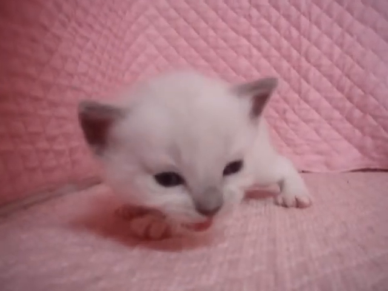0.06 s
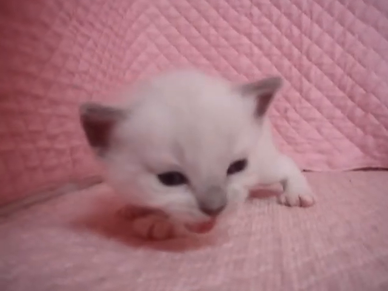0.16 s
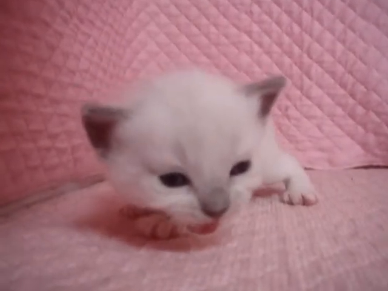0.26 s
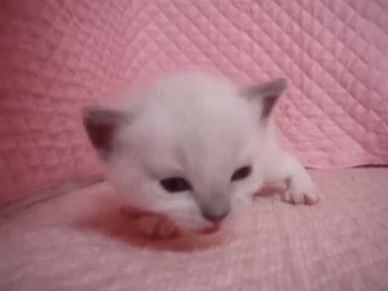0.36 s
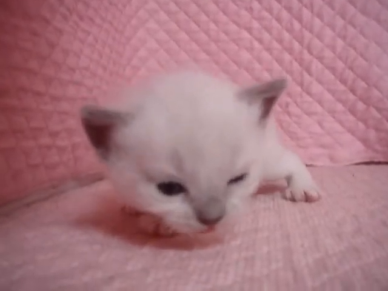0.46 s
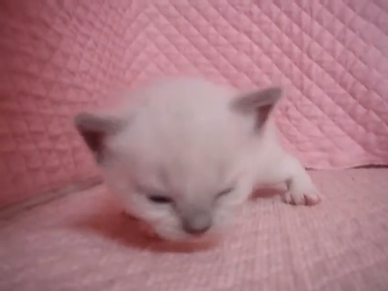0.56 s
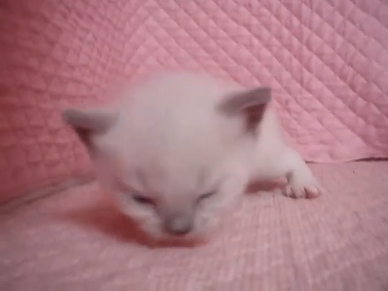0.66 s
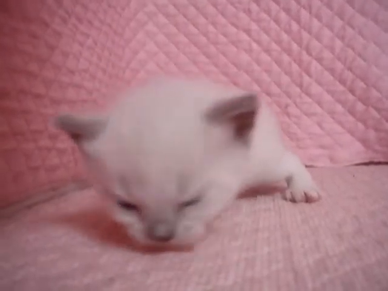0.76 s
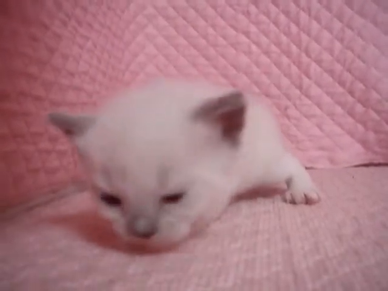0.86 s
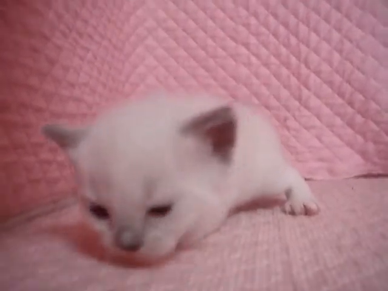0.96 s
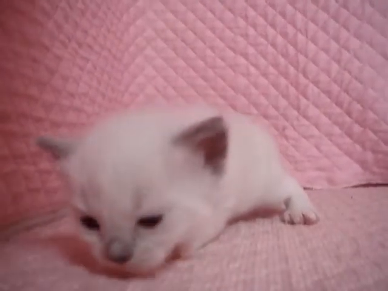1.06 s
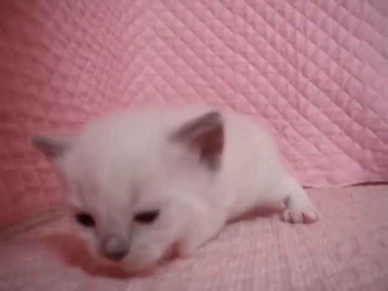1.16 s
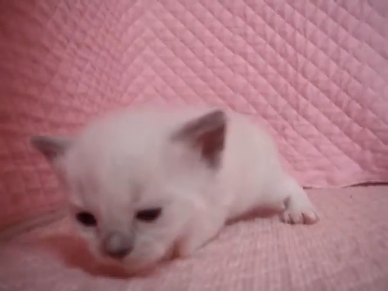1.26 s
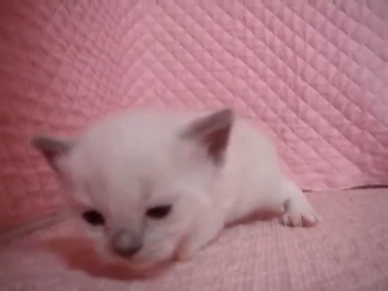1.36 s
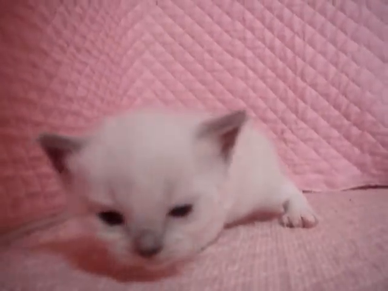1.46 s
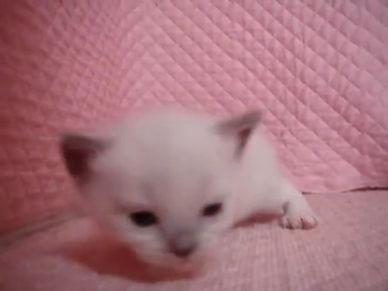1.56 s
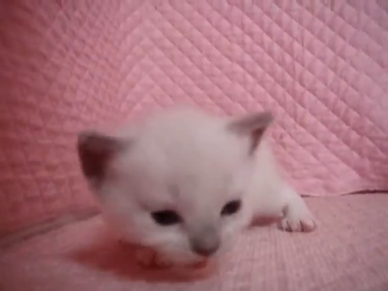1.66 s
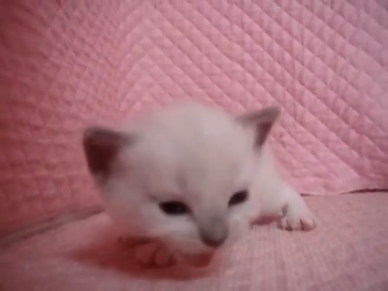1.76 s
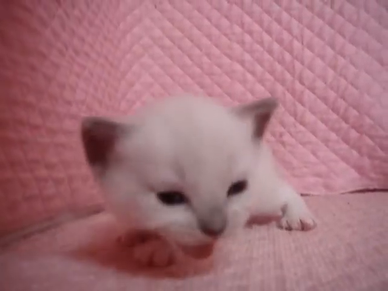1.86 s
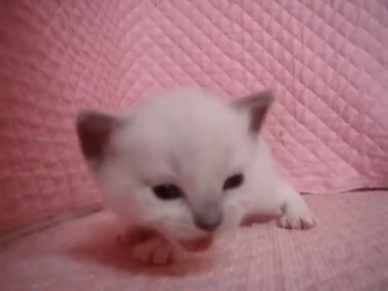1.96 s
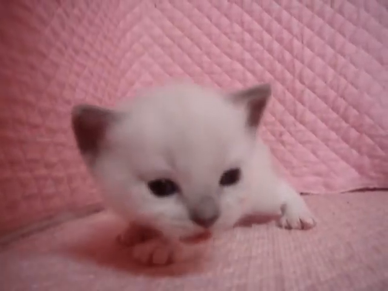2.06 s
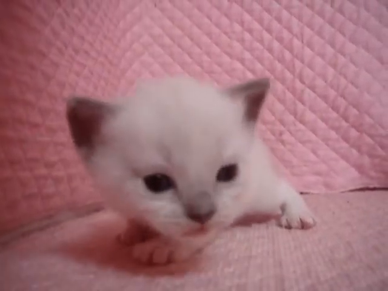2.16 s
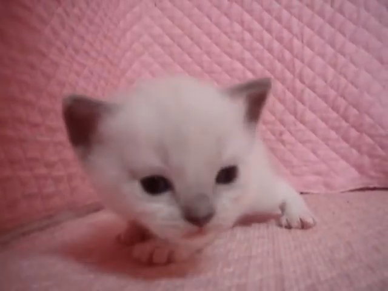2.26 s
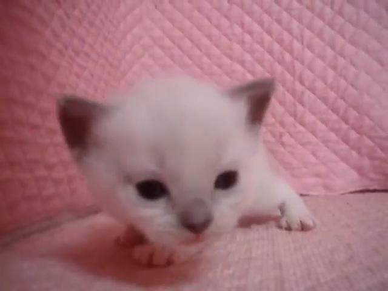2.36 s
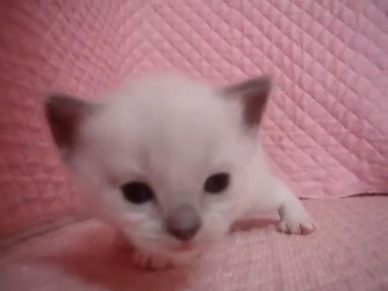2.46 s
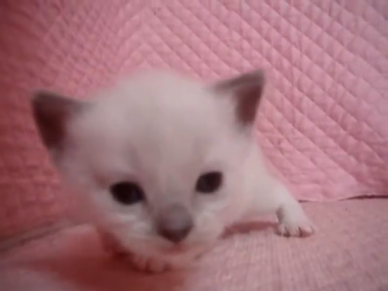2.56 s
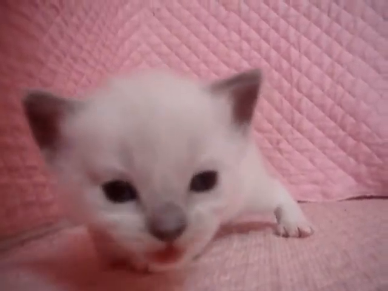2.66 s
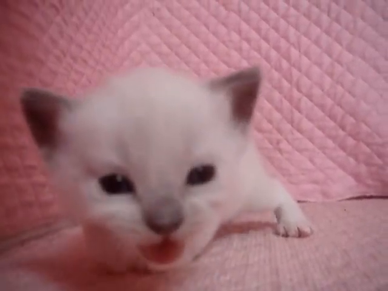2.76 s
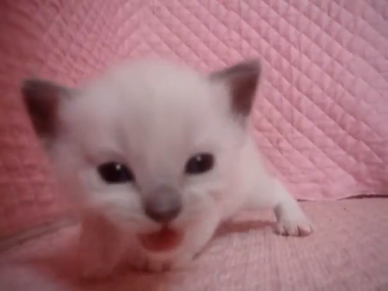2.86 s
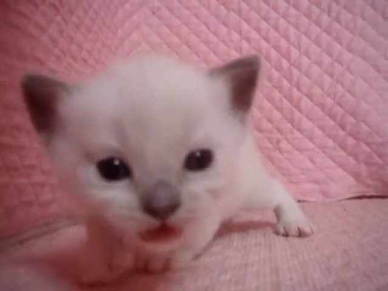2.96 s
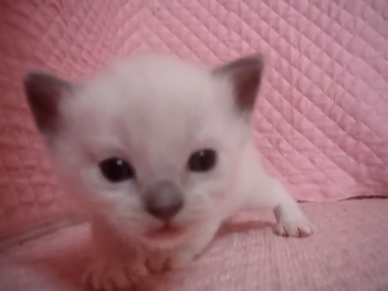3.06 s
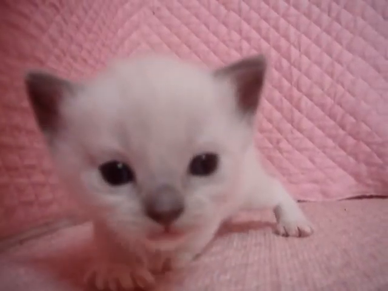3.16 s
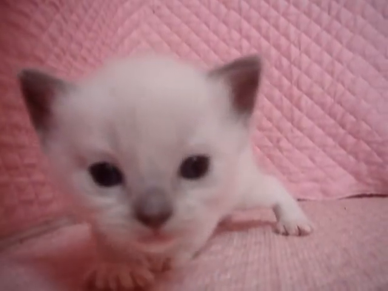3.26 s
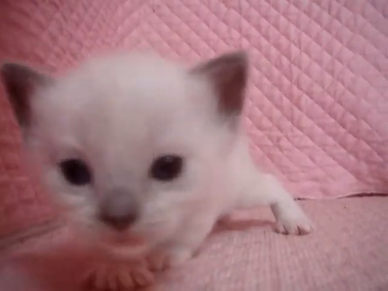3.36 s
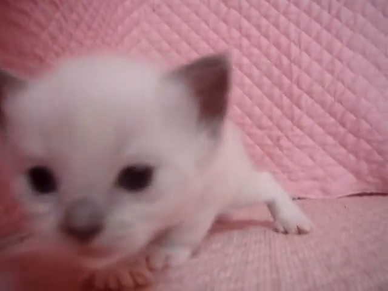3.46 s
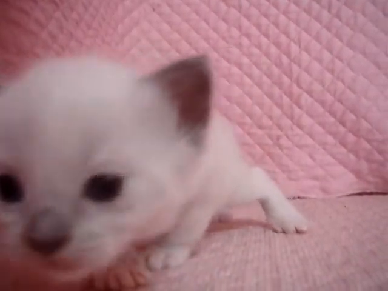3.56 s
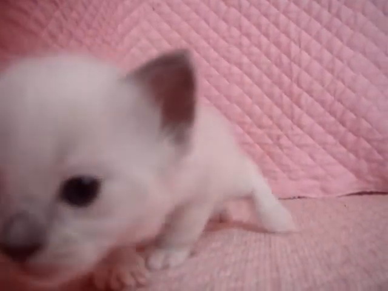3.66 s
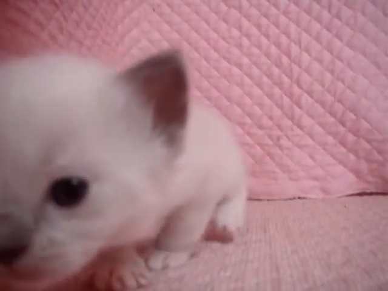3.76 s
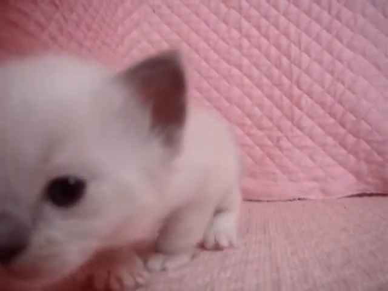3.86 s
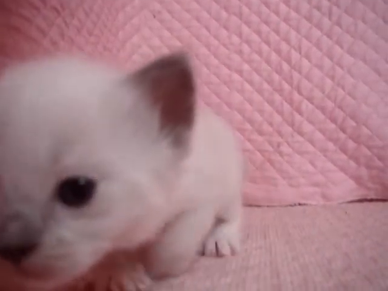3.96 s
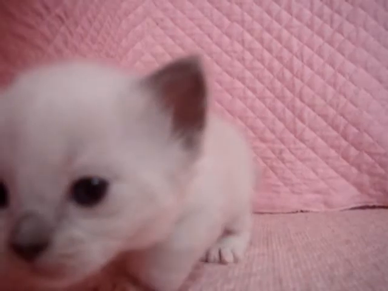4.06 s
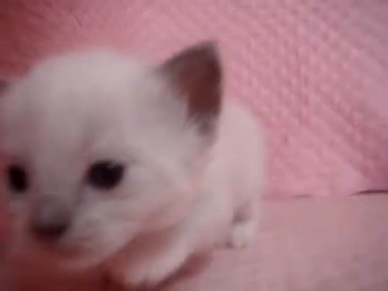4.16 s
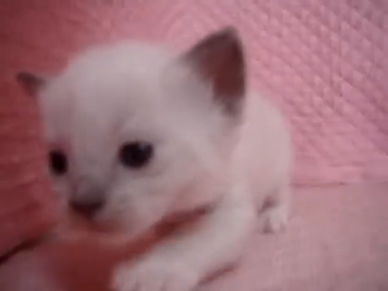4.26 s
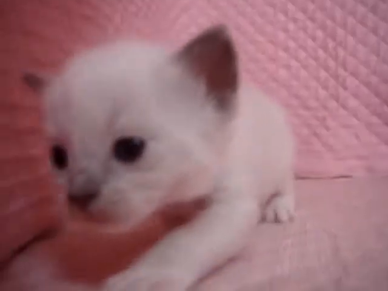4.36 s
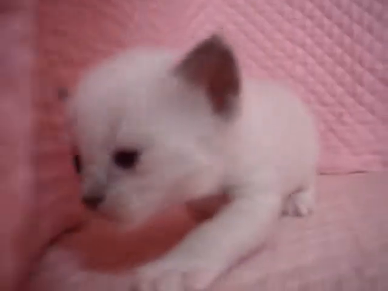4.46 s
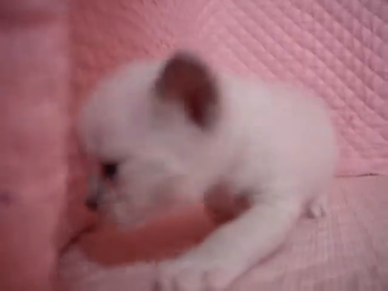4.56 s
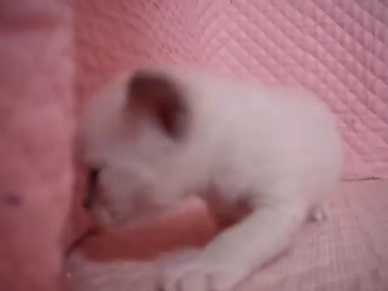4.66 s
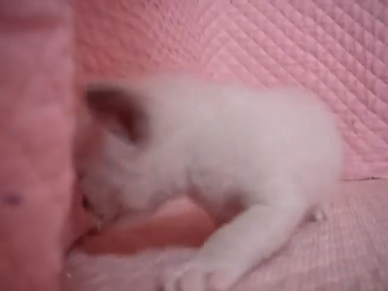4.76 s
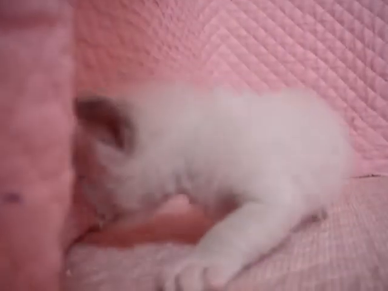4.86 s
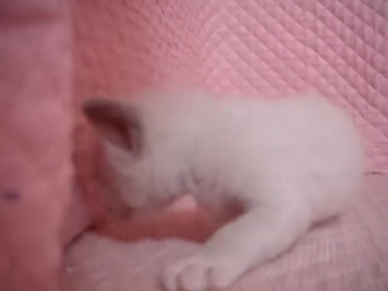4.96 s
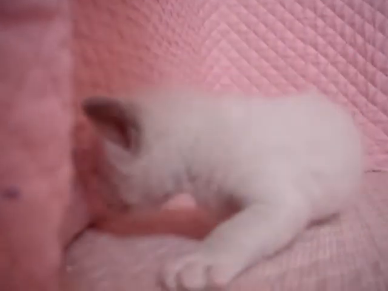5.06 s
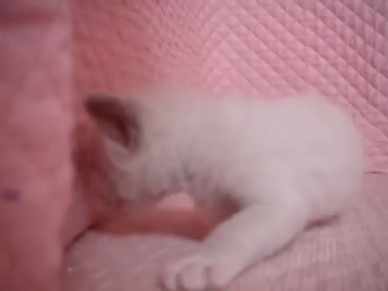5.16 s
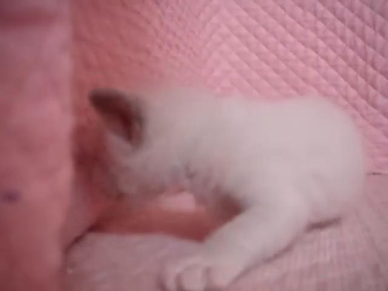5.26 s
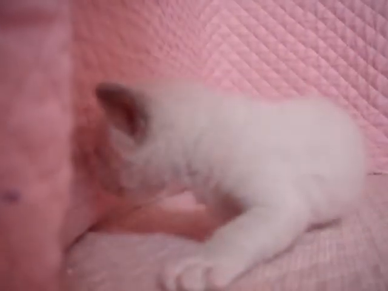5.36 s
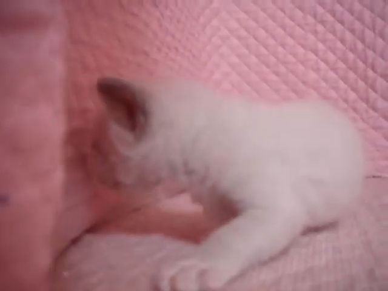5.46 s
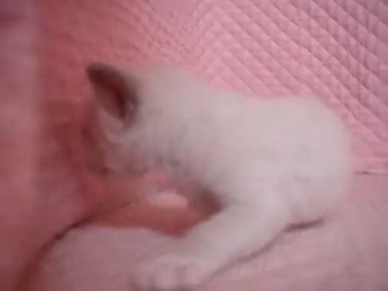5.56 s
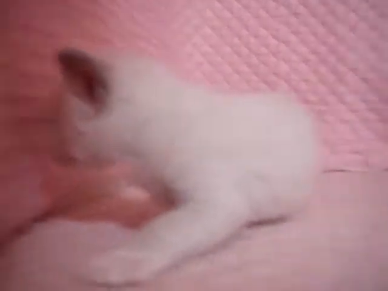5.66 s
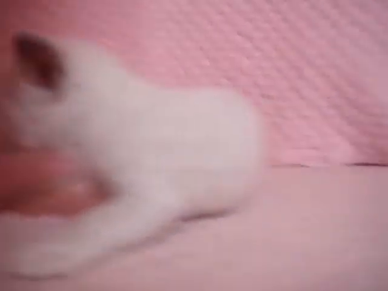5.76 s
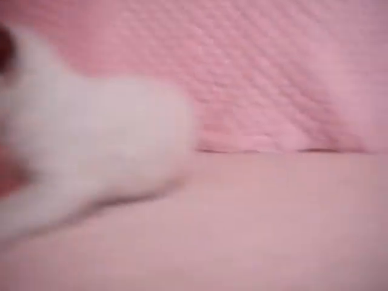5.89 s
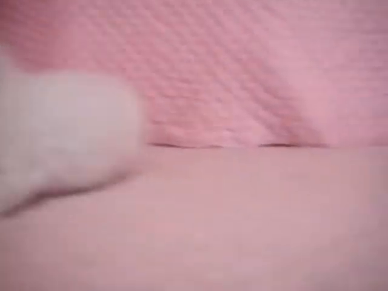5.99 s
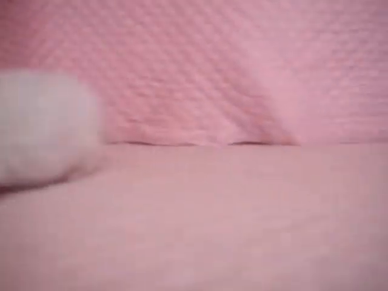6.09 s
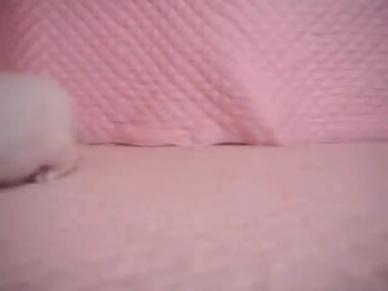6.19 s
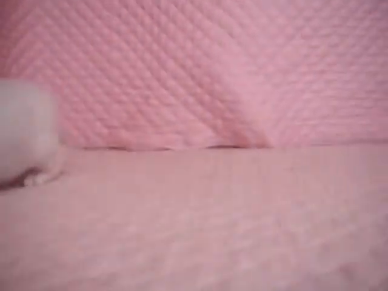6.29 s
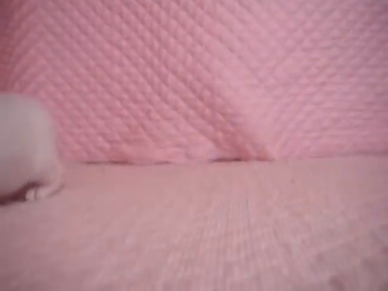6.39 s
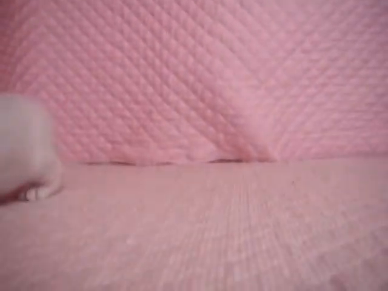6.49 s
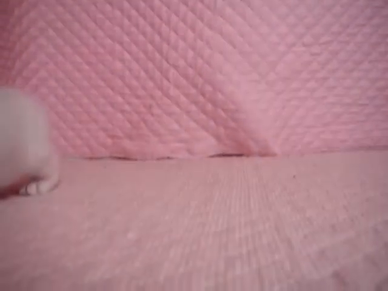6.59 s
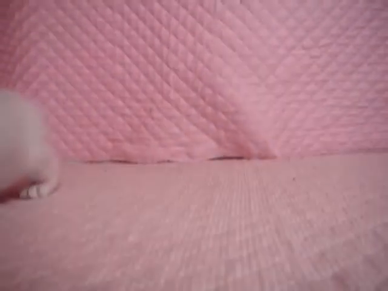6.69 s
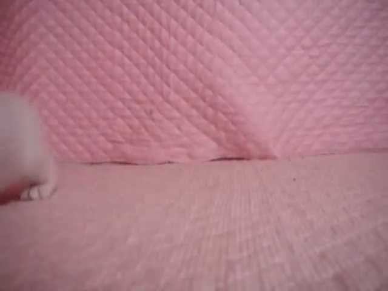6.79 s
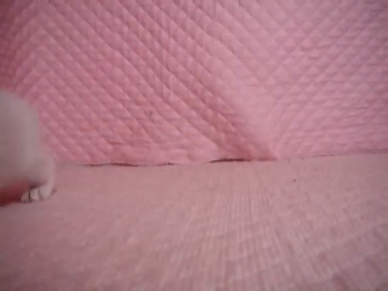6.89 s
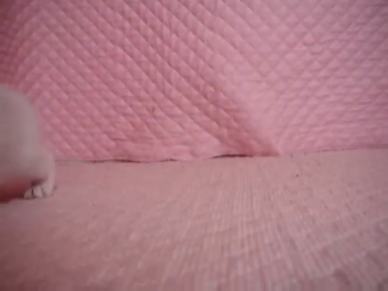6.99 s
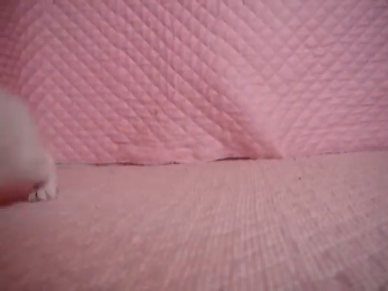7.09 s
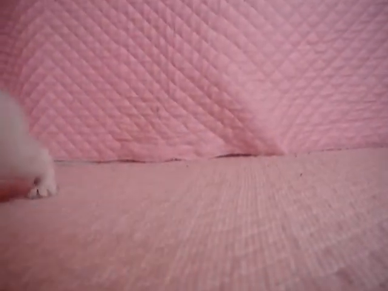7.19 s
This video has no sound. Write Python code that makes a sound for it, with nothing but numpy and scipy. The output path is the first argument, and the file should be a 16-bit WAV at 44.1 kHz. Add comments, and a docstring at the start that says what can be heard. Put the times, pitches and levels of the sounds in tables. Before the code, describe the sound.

A tiny kitten mews four times in high, rough-edged calls on a quilted bed, with cloth rustles, soft bumps and a faint thin whine.

```python
"""In a bedroom full of soft things, a small kitten mews four times on a quilted bed, close to a camera.
Each mew is a stack of tones that starts rough, scoops up and arches near 1.1 kHz; a creak leads into the last.
Shaped noise makes the cloth rustle, slide and bump as the kitten creeps off; ringing bursts of noise are ticks.
Behind lie a soft murmur of noise, a wavering hum and the thin whine of the camera's electronics."""
import sys
import numpy as np
from scipy import signal
from scipy.fft import rfft, irfft
from scipy.io import wavfile

SR = 44100
rng = np.random.default_rng(int(sys.argv[2]) if len(sys.argv) > 2 else 0)


def transcribe(u):
    """Save the signal u as a 16-bit wav file named by the first command-line argument.

    u: samples, shape (n,) or (channels, n), limited to [-1, 1]; the rate is SR.
    q: integer samples, one column per channel.
    """
    v = np.clip(np.atleast_2d(u).T, -1, 1)
    q = np.round(v * 32767).astype(np.int16)
    wavfile.write(sys.argv[1], SR, q)


N = 318842  # length [samples]
T = np.arange(N) / SR  # time of each sample [s]


def undb(db):
    """Turn decibels into a gain."""
    return 10 ** (np.asarray(db) / 20)


def unit(x):
    """Scale a sound to an average (rms) level of 1."""
    return x / np.sqrt(np.mean(x ** 2))


def shape(x, gain):
    """Filter a sound by a gain that depends on frequency."""
    hz = np.maximum(np.fft.rfftfreq(N, 1 / SR), 1)
    return irfft(rfft(x) * gain(hz), N)


def noise(points):
    """Make noise of rms 1, coloured by (frequency [Hz], level [dB]) points."""
    hz, db = np.transpose(points)
    return unit(shape(rng.standard_normal(N), lambda f: undb(np.interp(np.log(f), np.log(hz), db))))


def wander(rate):
    """Make a random motion of rms 1, up to about this rate [Hz]."""
    return unit(shape(rng.standard_normal(N), lambda f: 1 / (1 + (f / rate) ** 2)))


def swell(at, length):
    """Make a smooth hump of height 1 centred on a moment."""
    return np.cos(np.pi * np.clip((T - at) / length, -.5, .5))


def swells(rows, bow=1):
    """Add up humps from (middle [s], length [s], level [dB]) rows; a bow under 1 flattens their tops."""
    return sum(undb(db) * swell(at, length) ** bow for at, length, db in rows)


# colour of the room's steady murmur and hiss: (frequency [Hz], relative level [dB])
MURMUR_COLOUR = [(25, -12), (50, -12.5), (85, -11.5), (130, -7), (280, -2.5), (420, -1.5), (600, -3.5),
                 (850, -8.5), (1130, -10), (1900, -16.5), (4500, -22.5), (10000, -25)]


def room_murmur():
    """Low-heavy noise, gently wavering in level, is the sound of the quiet room."""
    return noise(MURMUR_COLOUR) * undb(-48 + .5 * wander(4))


# faint hum in the room: (middle frequency [Hz], middle level [dB])
HUM_TONES = [(120, -67.5), (272, -63.5), (420, -61.5), (597, -63)]


def hum():
    """Low tones drift a little in pitch and strength."""
    out = np.zeros(N)
    for hz, db in HUM_TONES:
        phase = 2 * np.pi * np.cumsum(hz + 5 * wander(15.17)) / SR
        out += undb(db + 2 * wander(4.6)) * np.sqrt(2) * np.sin(phase)
    return out


# tones of the camera's electronics: (frequency [Hz], level before the band filter [dB])
WHINE_TONES = [(7875, -45.6), (7625, -62.5)]
FRAME_HZ = 30  # pictures per second


def whine():
    """The camera's electronics sing; restarting the tones with every picture gives them a slight buzz."""
    since_frame = (T - .003) % (1 / FRAME_HZ)
    tones = sum(np.sqrt(2) * undb(db) * np.sin(2 * np.pi * hz * since_frame) for hz, db in WHINE_TONES)
    # keep only a band around the tones
    return shape(tones, lambda f: 1 / (1 + ((f - 7850) / 450) ** 4))


# colour of cloth sliding: (frequency [Hz], relative level [dB])
SLIDING_COLOUR = [(200, -10), (800, -1.5), (1600, -5.5), (2350, 3), (3300, -5), (4450, -2), (5300, -3.5),
                  (6200, -2.5), (10000, -4.5)]
# slow slides over the quilt: (middle [s], length [s], level before flutter [dB])
SLOW_SLIDES = [(.02, 0.42, -44.5), (.3, 0.25, -48.5), (1.66, .2, -60), (3.3, .36, -52.5),
               (3.61, 0.34, -50.5), (3.97, 0.4, -49.5), (4.37, 0.55, -40), (5.92, 1.006, -38),
               (7.02, 0.43, -58)]


def quilt_slides():
    """Countless threads slip under slow sliding, which makes a dull, fluttering hiss."""
    return noise(SLIDING_COLOUR) * swells(SLOW_SLIDES, bow=0.52) * undb(1.17 * wander(44))


# colour of fur and claws on cloth: (frequency [Hz], relative level [dB])
BRUSHING_COLOUR = [(500, -13), (3000, -10.5), (6000, -7), (8500, 0.5), (10000, -3.5)]
# short brushes of fur and claws: (middle [s], length [s], level before flutter [dB])
QUICK_BRUSHES = [(.03, 0.022, -41), (1.28, 0.15, -51.5), (1.368, 0.033, -40), (1.46, 0.12, -48.5),
                 (1.56, 0.056, -42), (1.66, 0.1, -42.5), (1.773, 0.012, -28.5), (1.782, 0.0043, -28),
                 (1.805, 0.043, -42), (2.31, 0.065, -43), (2.42, 0.17, -41.5), (2.575, 0.095, -44.5)]


def quilt_brushes():
    """Quick brushes slip the threads faster, which makes a bright, fluttering hiss."""
    return noise(BRUSHING_COLOUR) * swells(QUICK_BRUSHES) * undb(2 * wander(85))


# claws catching threads: (start [s], peak level [dB], centre frequency [Hz], decay [s])
THREAD_TICKS = [(0.042, -26, 7140, 0.00087), (1.679, -19.5, 8000, .0003), (2.6545, -29, 2200, 0.0012),
                (2.666, -28, 3830, 0.0008), (3.5999, -29.5, 2000, 0.00026), (5.7608, -26.5, 2400, 0.0058)]


def claw_ticks():
    """A claw catches a thread: noise around one frequency starts at once and dies away."""
    out = np.zeros(N)
    for at, db, hz, decay in THREAD_TICKS:
        colour = [(hz / 10, -25), (hz / 2, -10), (hz, 0), (hz * 2, -14), (hz * 4, -26)]
        fade = (T >= at) * np.exp(-np.clip((T - at) / decay, 0, 20))
        tick = noise(colour) * fade
        out += undb(db) * tick / np.abs(tick).max()
    return out


# throat resonances: (frequency [Hz], width [Hz], relative level [dB])
THROAT_RINGS = [(2450, 2700, 1), (3930, 1100, -23.5), (6100, 930, -2.5)]


def throat(hz):
    """The throat's resonances strengthen some frequencies, above a floor of -8 dB."""
    power = undb(-8) ** 2
    for centre, width, db in THROAT_RINGS:
        power = power + undb(db) ** 2 / (1 + (2 * (hz - centre) / width) ** 2) ** 2
    return np.sqrt(power)


ONSET_S, ACCENT_S, RELEASE_S = .00087, 0.0083, 0.0058
DIP_AFTER_S, DIP_S = 0.0105, .023  # the pitch sags as the folds catch
FLICK_OCT_PER_S, FLICK_LOSS_DB_PER_S = 7.36, 108  # it flicks up, weakening, as they let go
SECOND_FADE_DB_PER_S, UPPER_FADE_DB_PER_S = 8.5, 17  # the voice dulls as the push runs out
UPPER_LOSS_DB_PER_OCT = 15  # tighter folds give a purer tone
MUFFLE_OCT_PER_S = 0.36  # the treble roll-off sinks through a mew
START_ROUGH, START_ROUGH_S, DIP_ROUGH = 0.15, 0.0096, 0.94  # uneven beats at the catch, more in a deep dip
PUFF_AFTER_S, PUFF_S = 0.026, 0.062  # air that the kitten lets out as a mew ends
# moves of the mouth that thin (-) or fill (+) the voice: (middle [s], length [s], change of first partial [dB],
# change of upper partials [dB])
MOUTH_MOVES = [(0.479, .12, 3, -0.5), (.54, .07, 0, 5.5), (1.92, .1, 2.5, 0), (2.044, 0.24, -6.5, -6),
               (2.186, 0.18, 2.5, -7), (2.81, 0.047, 2, 0), (2.895, 0.027, -7, -5), (2.97, .14, 4.5, -2.5),
               (3.076, 0.12, -3.5, -4), (4.964, 0.064, 3.5, 1)]
# hoarse breaks: (middle [s], length [s], roughness [0-1])
HOARSE_BREAKS = [(2.12, 0.011, 0.12), (2.2, .14, .05), (2.283, .04, 0.23), (3.1, .05, .13),
                 (3.15, 0.097, 0.15), (4.92, .03, 0.04)]


def mew(row, arch, tremor, flutter, shimmer, air):
    """Vocal folds catch, glide over an arch and flick up; upper partials fade with time and rising pitch."""
    start, length, first_db, second_db, upper_db, muffle_hz, accent_db, dip, flick, puff_db = row
    on = (T >= start) & (T < start + length)
    age = T[on] - start
    left = length - age

    sag = dip * swell(start + DIP_AFTER_S, DIP_S)[on]
    flicked = np.maximum(flick - left, 0)  # time since the flick began [s]
    hz = np.interp(T[on], *np.transpose(arch)) * (1 - sag) * 2 ** (FLICK_OCT_PER_S * flicked)

    rough = START_ROUGH * np.exp(-age / START_ROUGH_S) + DIP_ROUGH * sag
    rough = rough + sum(depth * swell(at, span)[on] for at, span, depth in HOARSE_BREAKS)
    # a slow tremor bends the pitch; roughness shakes it from cycle to cycle
    bend = 1 + 0.0063 * tremor[on] + (0.0046 + 0.21 * rough) * flutter[on]
    phase = 2 * np.pi * np.cumsum(hz * bend) / SR

    k = np.arange(1, 10)[:, None]  # partial numbers
    mouth_db, edge_db = sum(np.outer(dbs, swell(at, span)[on]) for at, span, *dbs in MOUTH_MOVES)
    low = undb([first_db + mouth_db, second_db - SECOND_FADE_DB_PER_S * age])
    upper_hz = k[2:] * hz
    high = throat(upper_hz) / (1 + (upper_hz / muffle_hz * 2 ** (MUFFLE_OCT_PER_S * age)) ** 8)
    bright_db = upper_db + edge_db - UPPER_FADE_DB_PER_S * age
    bright_db = bright_db - UPPER_LOSS_DB_PER_OCT * np.log2(hz / 1000)
    high = high * undb(bright_db) / np.sqrt(np.sum(high ** 2, axis=0))

    # each partial flickers on its own, by reading the tremor at its own half-second offset
    flicker = tremor[(np.flatnonzero(on) + k * SR // 2) % N]
    partials = np.vstack([low * undb(0.45 * flicker[:2]), high * undb(0.53 * flicker[2:])])
    # the throat delays each partial differently, which smears the pulses
    smear = np.pi * k ** 2 / len(k) * 2
    voice = np.sqrt(2) * np.sum(partials * np.cos(k * phase - smear), axis=0)
    voice = voice * (1 + (0.073 + 0.63 * rough) * shimmer[on]) * undb(.35 * tremor[on])
    # air leaks through the folds once a cycle
    leak = np.linalg.norm(low, axis=0) * (undb(-27.0) + 1.42 * rough)
    voice = voice + leak * air[on] * (1 + np.cos(phase))

    gate = np.minimum(age / ONSET_S, 1) * np.minimum(left / RELEASE_S, 1)
    loudness_db = accent_db * np.exp(-age / ACCENT_S) - FLICK_LOSS_DB_PER_S * flicked
    out = undb(puff_db) * air * swell(start + length + PUFF_AFTER_S, PUFF_S)
    out[on] += voice * gate * (1 - sag) * undb(loudness_db)
    return out


# the mews; the last is aimed away, into the quilt. Levels are those before the fades and mouth moves:
# (start [s], length [s], first partial [dB], second partial [dB], upper partials at 1 kHz pitch [dB],
#  starting treble roll-off [Hz], accent at the start [dB], pitch dip at the start [0-1],
#  length of the closing flick [s], puff of air [dB])
MEW_ROWS = [(0.1365, 0.42, -41, -36, -46.5, 7400, 4.5, 0, .014, -50),
            (1.727, .57, -40.5, -34.5, -41, 7600, 0.5, .2, 0.039, -48.5),
            (2.712, .469, -40, -35.5, -46, 6100, -0.5, .22, .03, -44.5),
            (4.794, 0.219, -37.5, -44.5, -50.5, 3180, -16, .05, 0, -57)]
# the arch of each mew, one list per mew: (time [s], pitch before dip, flick and tremor [Hz])
PITCH_ARCHES = [
    [(0.14, 883), (0.158, 986), (0.182, 1017), (0.194, 1065), (0.33, 1128), (0.34, 1169), (0.45, 1099),
     (0.512, 930), (0.545, 893)],
    [(1.75, 922), (1.788, 1009), (1.814, 1001), (1.894, 1056), (2.03, 1130), (2.132, 1104), (2.216, 1042),
     (2.244, 1095), (2.265, 1025)],
    [(2.735, 904), (2.745, 934), (2.767, 979), (2.945, 1149), (2.957, 1133), (2.977, 1189), (3.009, 1120),
     (3.145, 1048), (3.15, 1089)],
    [(4.803, 760), (4.809, 800), (4.821, 921), (4.847, 1034), (4.883, 1094), (4.953, 1116), (4.985, 1106),
     (5.005, 1107)],
]


def kitten():
    """Four mews share one throat, which also colours the air."""
    air = rng.standard_normal(N)
    air = unit(shape(air, lambda f: throat(f) + 0.91 / (1 + ((f - 1800) / 600) ** 2)))
    tremor, flutter, shimmer = wander(46), wander(300), wander(340)
    return sum(mew(row, arch, tremor, flutter, shimmer, air) for row, arch in zip(MEW_ROWS, PITCH_ARCHES))


def bedroom(x, t60=0.08, wet_db=-23):
    """Soft things soak up the sound, leaving a short, weak echo that falls 60 dB in t60 seconds."""
    t = T[:SR // 2]
    tail = rng.standard_normal(len(t)) * undb(-60 * t / t60) * (t > .004)
    return x + undb(wet_db) * signal.fftconvolve(x, tail / np.linalg.norm(tail))[:N]


# colour of bumps on the bed: (frequency [Hz], relative level [dB])
BUMPING_COLOUR = [(60, -28), (300, -1), (400, -2.5), (540, 5.5), (830, -12.5), (1170, -6), (1600, -15.5),
                  (3500, -21), (8000, -36)]
# soft bumps: (middle [s], length [s], level before flutter [dB])
BED_BUMPS = [(2.4, 0.19, -48), (3.58, 0.19, -47.5), (3.836, 0.032, -45.5), (4.724, 0.026, -47),
             (5.72, 0.02, -38.5), (5.77, 0.021, -43.5), (6.27, 0.014, -41), (6.78, 0.059, -45),
             (6.97, 0.62, -49), (7.2, 0.061, -42.5)]


def bed_bumps():
    """Soft bumps on the bed are short humps of dull, fluttering noise."""
    return noise(BUMPING_COLOUR) * swells(BED_BUMPS) * undb(1.3 * wander(37))


CREAK_AT_S, CREAK_GAP_S, CREAK_QUICKEN, CREAK_DB = 4.7747, .0066, 0.96, -33.5  # each gap is 0.96 of the last
# the throat's ring under the creak: (first frequency [Hz], second frequency [Hz])
CREAK_RINGS = 1500, 2280


def creak(count):
    """Slack folds tick ever faster into the last mew, and each tick rings the throat."""
    out, at = np.zeros(N), CREAK_AT_S
    for i in range(count):
        age = np.clip(T - at, 0, .05)
        out += np.exp(-age / 0.0007) * sum(np.sin(2 * np.pi * hz * age) for hz in CREAK_RINGS)
        at += CREAK_GAP_S * CREAK_QUICKEN ** i
    return undb(CREAK_DB) * out


def scene():
    """One microphone feeds both channels; only the kitten's voice gets the echo."""
    background = room_murmur() + hum() + whine()
    quilt = quilt_slides() + quilt_brushes() + claw_ticks() + bed_bumps()
    voice = bedroom(kitten() + creak(count=5))
    mono = background + quilt + voice
    return np.array([mono, mono])


def record(dry):
    """The camera cuts everything above about 10.1 kHz steeply."""
    low_pass = signal.ellip(10, .1, 60, 10100, fs=SR, output="sos")
    return signal.sosfiltfilt(low_pass, dry)


dry = scene()
out = record(dry)
transcribe(out)
```